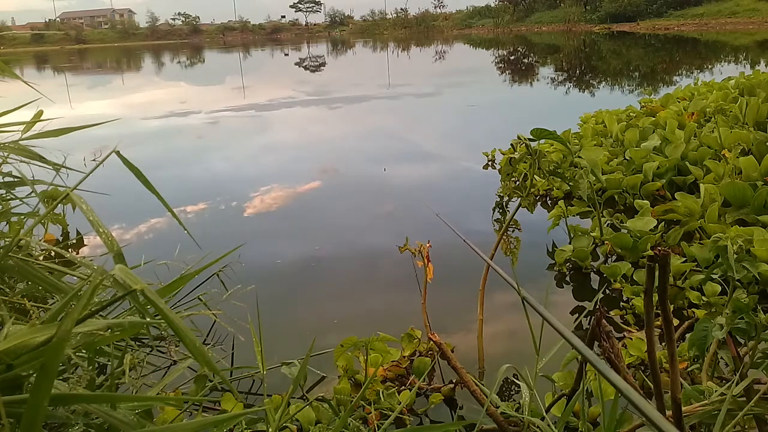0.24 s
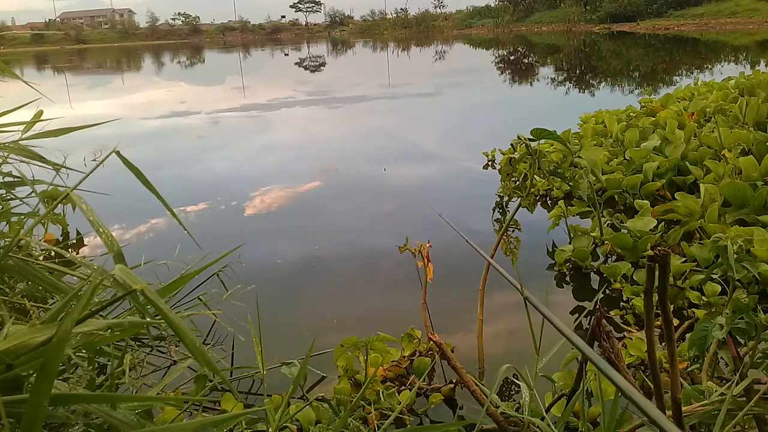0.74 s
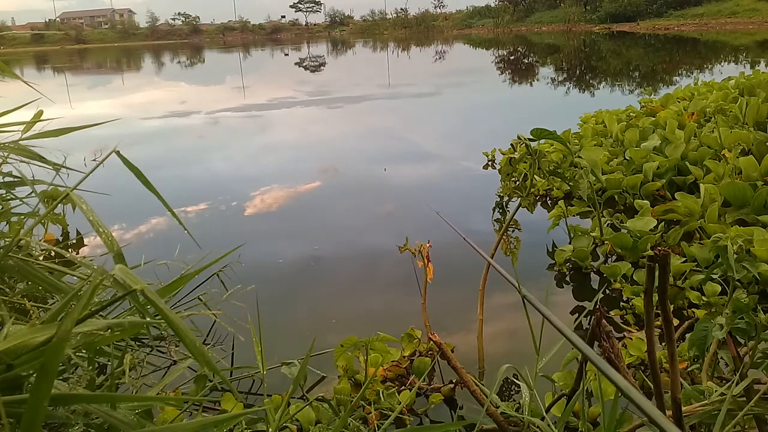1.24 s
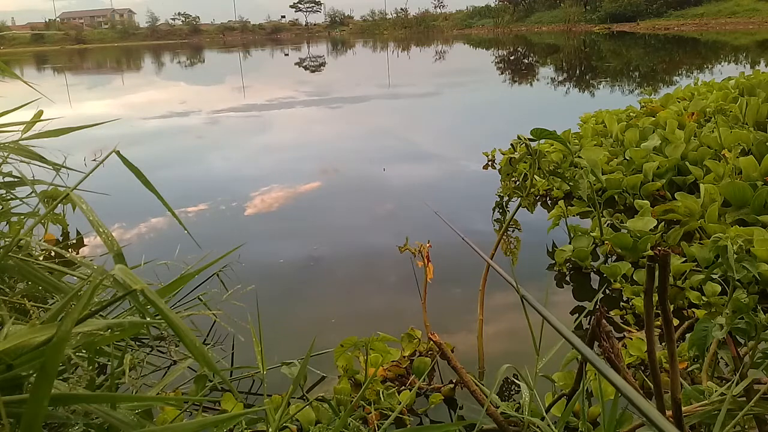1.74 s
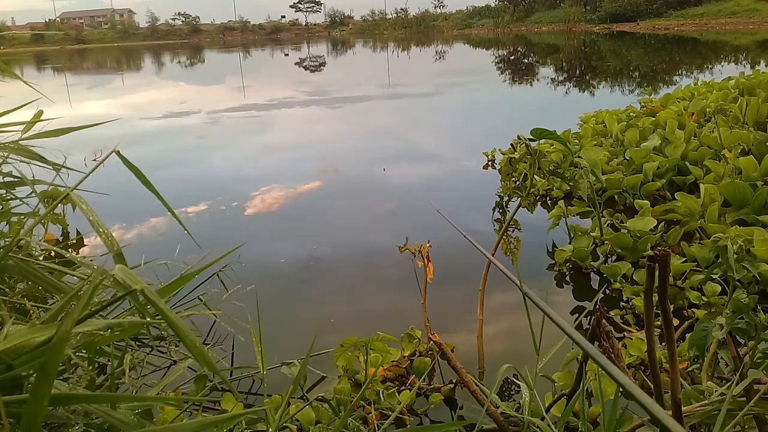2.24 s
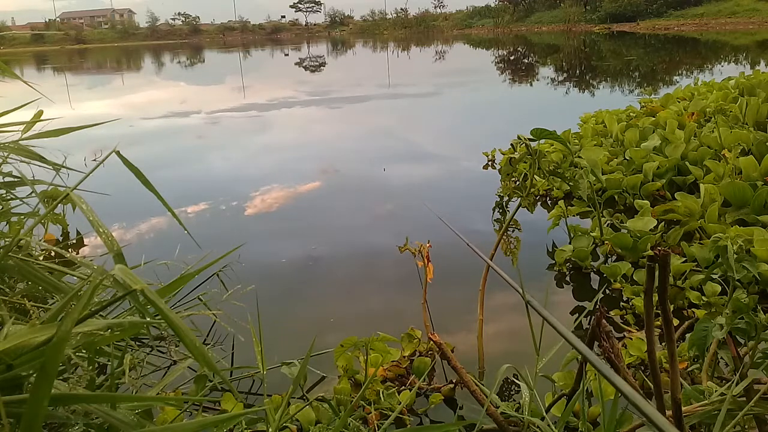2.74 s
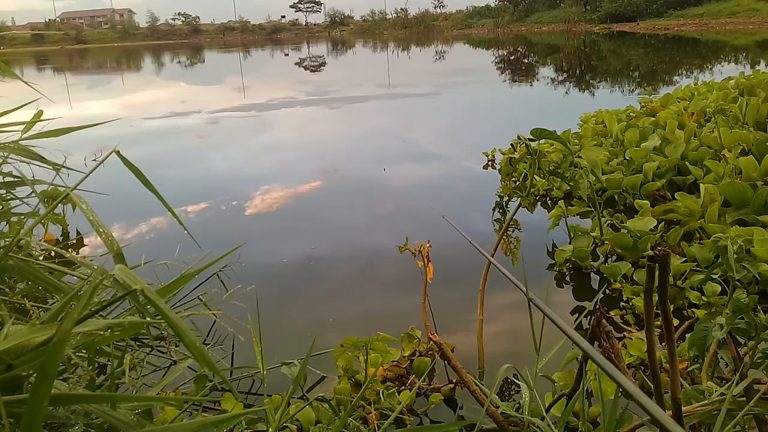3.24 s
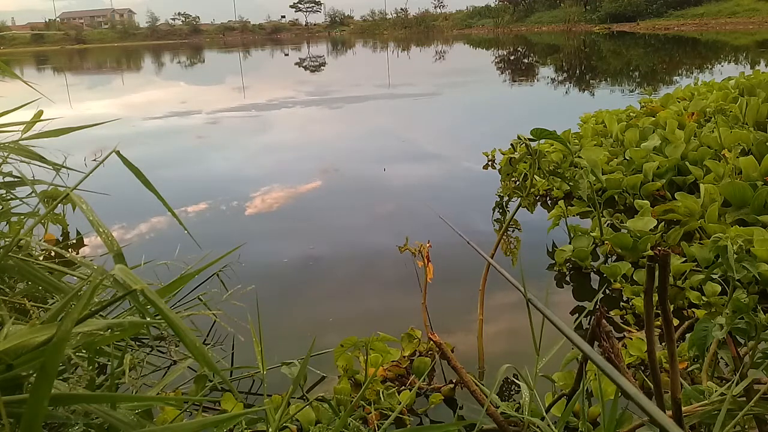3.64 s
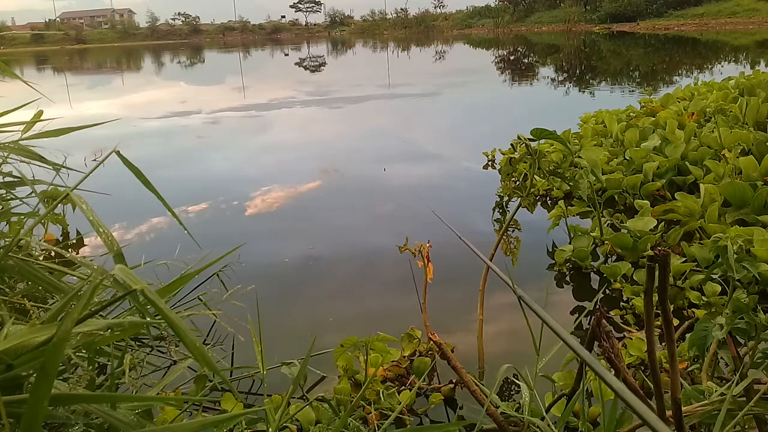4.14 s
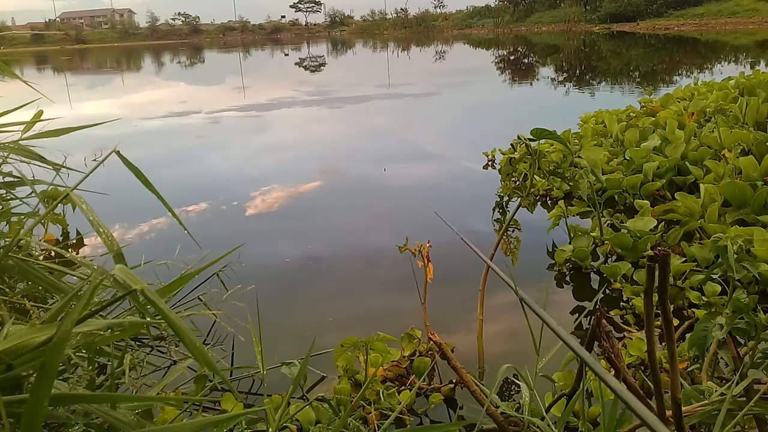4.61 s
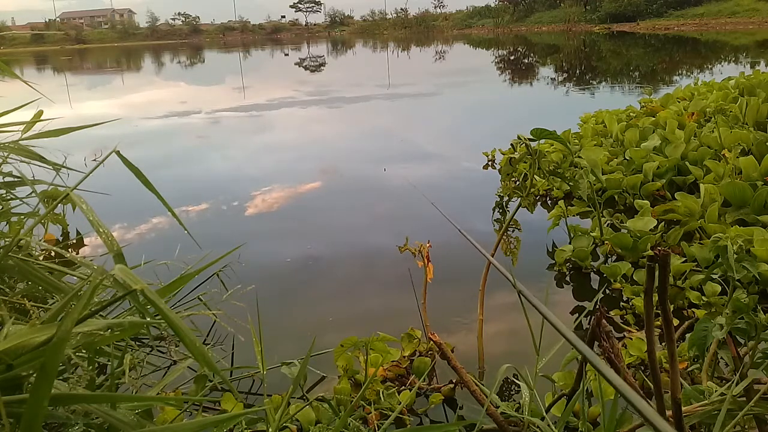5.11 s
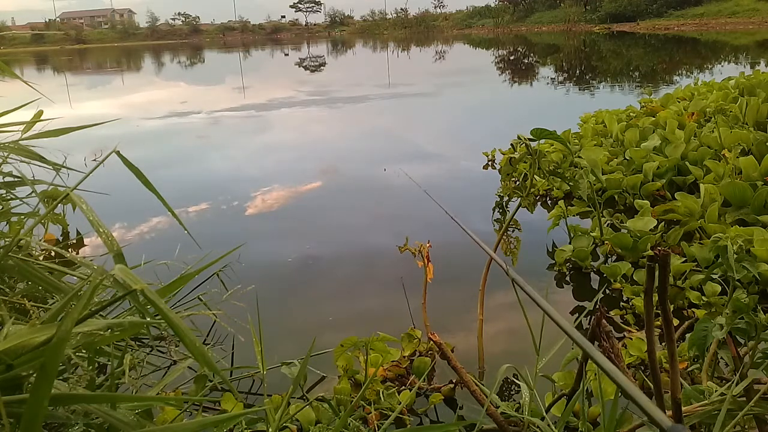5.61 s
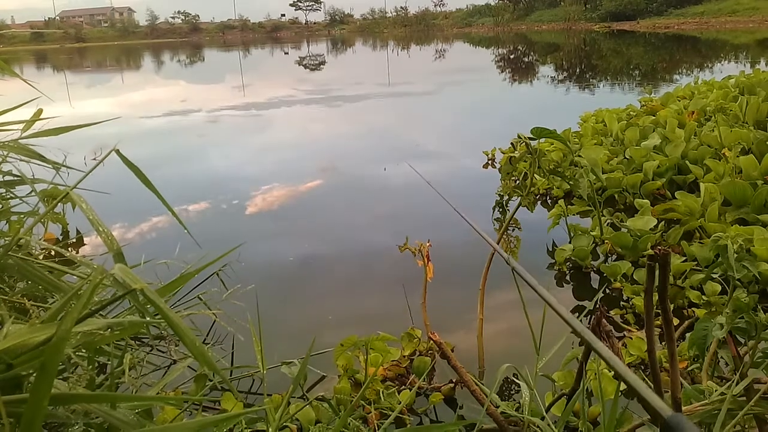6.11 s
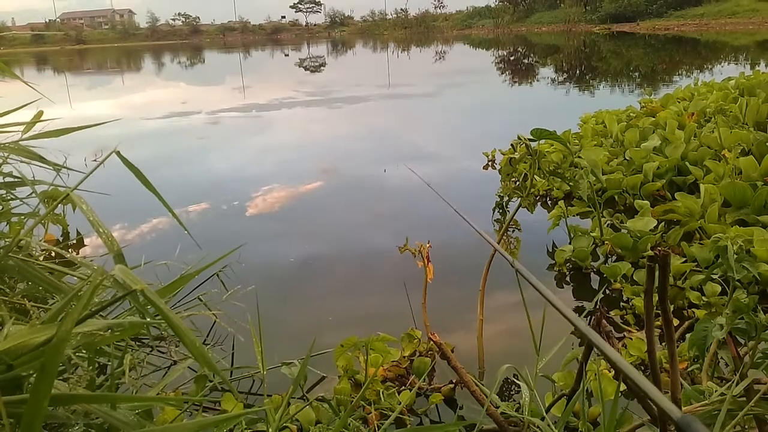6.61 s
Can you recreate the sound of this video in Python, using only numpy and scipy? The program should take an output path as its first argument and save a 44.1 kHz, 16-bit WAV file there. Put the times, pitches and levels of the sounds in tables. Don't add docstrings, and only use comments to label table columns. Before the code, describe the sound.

Evening beside a pond, heard by one microphone with faint hiss on both channels. A steady, deep distant rumble continues throughout; a soft low-mid engine drone fades as it moves away, mostly during the first second. From 0 to 1.9 s a near cricket gives crisp, very high chirps of a few rapid pulses, about seven a second, with small gaps. Distant crickets rasp more faintly, the louder one until 3 s, a weaker one throughout. A thin katydid buzz swells for about half a second and stops, roughly once a second. Sparse, faint bird notes grow denser from 3 s: falling slurs, arched peeps and drooping whistles, clearest around 3.7-5.1 s. A far flock flares softly near 3.8 and 6.3 s. Dry fishing-rod ticks dot the scene; at 5.9 s a quick rattle rings a small metal part, followed by ticks at 6.3 and 6.6 s.

```python
import sys
import numpy as np
from scipy import signal
from scipy.fft import rfft, irfft
from scipy.io import wavfile
from scipy.ndimage import map_coordinates

SR = 44100
rng = np.random.default_rng(int(sys.argv[2]) if len(sys.argv) > 2 else 0)


def inscribe(sig):
    pcm = np.round(np.clip(np.atleast_2d(sig).T, -1, 1) * 32767)
    wavfile.write(sys.argv[1], SR, pcm.astype(np.int16))


def volts_from_db(level):
    exponent = np.asarray(level, float) / 20
    return 10 ** exponent


N = 302526


def level(x, db):
    return x * volts_from_db(db) / np.sqrt(np.mean(x ** 2))


def ring(x, hz, width_hz):
    b, a = signal.iirpeak(hz, hz / width_hz, fs=SR)
    once = signal.lfilter(b, a, x)
    return signal.lfilter(b, a, once)


def walk(rate):
    spots = rng.standard_normal(size=6000)
    return map_coordinates(spots, [np.arange(N) * rate / SR], order=2)


def add(out, s, sound):
    i = int(s * SR)
    out[i:i + len(sound)] += sound[:N - i]


def scatter(x, t60_s, wet_db, gap_s=0.0097, smear_hz=260):
    t = np.arange(SR // 2) / SR
    decay = np.exp(-np.log(1000) * t / t60_s)
    onset = np.clip(t / gap_s, 0, 1) ** 2
    tail = rng.standard_normal(len(t)) * decay * onset
    tail *= volts_from_db(wet_db) / np.sqrt(np.sum(tail ** 2))
    smeared = x * walk(smear_hz)
    return x + signal.fftconvolve(smeared, tail)[:N]


def throb(rate_hz, sharp, jitter):
    wandering_hz = rate_hz * (1 + jitter * walk(24))
    phase = 2 * np.pi * np.cumsum(wandering_hz) / SR
    return np.exp(sharp * (np.cos(phase) - 1))


def phrases(rows, swell_db_per_s, fade_db_per_s, rest_db):
    t = np.arange(N) / SR
    out = np.full(N, float(rest_db))
    for s, hold, db in rows:
        swell = swell_db_per_s * np.clip(s - hold - t, 0, None)
        fade = fade_db_per_s * np.clip(t - s, 0, None)
        out = np.maximum(out, db - swell - fade)
    return out


def sing(rows):
    scoop_share, scoop_s = 1.59, 0.0071
    out, waver, flutter = np.zeros(N), walk(90), walk(85)
    for s, length, start_hz, change_hz, arch_hz, db in rows:
        u = np.linspace(0, 1, int(length * SR))
        arch = 4 * u * (1 - u) - scoop_share * np.exp(-u * length / scoop_s)
        hz = start_hz + change_hz * u + arch_hz * arch
        at = slice(int(s * SR), int(s * SR) + len(u))
        tone = np.sin(2 * np.pi * np.cumsum(hz * (1 + 0.008 * waver[at])) / SR)
        loudness = volts_from_db(db + 4.5 + 2.4 * (flutter[at] - flutter[at].mean()))
        out[at] += loudness * np.sin(np.pi * u) ** 0.36 * tone
    return scatter(out, 0.25, -3.5, 0.01, smear_hz=699)


def rumble():
    # frequency in Hz, density in dB per Hz.
    spectrum = [(14, -52.5), (25, -19.5), (50, -8), (85, 0), (150, 0), (200, -6.5), (300, -16),
                (420, -25.5), (590, -36.5), (1260, -44.5), (2400, -48), (3500, -52.5), (5200, -53.5),
                (6500, -64), (9000, -58.5), (16000, -62.5)]
    hz = np.maximum(np.fft.rfftfreq(N, 1 / SR), 1)
    spots, dbs = np.transpose(spectrum)
    colour = volts_from_db(np.interp(np.log(hz), np.log(spots), dbs))
    air = irfft(rfft(rng.standard_normal(N)) * colour, N)
    return level(air * volts_from_db(0.4 * walk(2.79)), -43.5)


def engine_drone():
    # time in s, level in dB.
    course = [
        (0.0, -63.5),
        (0.8, -69),
        (3.8, -70.5),
        (5.3, -74.5),
        (6.86, -73),
    ]
    course_db = np.interp(np.arange(N) / SR, *np.transpose(course))
    band = level(ring(rng.standard_normal(N), 484, 110), -3.0)
    return band * volts_from_db(course_db + 1.5 * walk(4.5))


def far_crickets():
    # end of hold in s, hold in s, level in dB.
    loud_singer = [
        (.02, .03, -74.5),
        (.31, 0.035, -74.5),
        (.63, .04, -73),
        (.95, 0.077, -74.5),
        (1.26, 0.065, -74),
        (1.7, .04, -82),
        (2.03, 0.064, -80),
        (2.34, .04, -78.5),
        (2.65, 0.016, -76.5),
        (2.97, .02, -74.5),
    ]
    # end of hold in s, level in dB.
    faint_singer = [(.09, -84), (.52, -87), (.8, -85), (1.05, -82), (1.4, -83), (1.88, -82), (2.2, -82),
                    (2.5, -81), (2.76, -86), (3.29, -83.5), (3.45, -88), (3.56, -81.5), (3.66, -86),
                    (3.78, -85), (3.9, -90), (4.0, -87), (4.12, -86), (4.24, -84), (4.47, -84), (4.72, -82),
                    (4.99, -82.5), (5.26, -83), (5.52, -89), (5.73, -88), (5.97, -83), (6.1, -85),
                    (6.21, -84), (6.44, -79.5), (6.72, -83)]
    faint = [(s, 0.033, db) for s, db in faint_singer]
    rest_db = -99
    loud_db = phrases(loud_singer, 202, 280, rest_db)
    faint_db = phrases(faint, 105, 253, rest_db)
    db = np.maximum(loud_db, faint_db)
    rasp = rng.standard_normal(N) * throb(118, 0.69, 0.0596)
    upper = volts_from_db(-4.5 - 0.83 * np.clip(-81.0 - db, 0, None)) * ring(rasp, 8590, 200)
    wings = (ring(rasp, 8150, 260) + upper) / np.std(ring(rasp, 8170, 277))
    return scatter(wings * volts_from_db(db - 0.8), 0.12, -0.5, 0.004)


def wing_flicks():
    # start in s, level in dB.
    flicks = [
        (0.013, -75),
        (0.44, -78),
        (1.24, -80),
        (1.665, -77),
    ]
    length_s, hz, sag_hz = .013, 7500, -100
    return sing([(s, length_s, hz, sag_hz, 0, db) for s, db in flicks])


def near_cricket():
    # first stroke in s, span in s, number of strokes, first stroke in dB, full stroke in dB.
    chirps = [(0.0731, 0.033, 5, -53.5, -49.5), (0.206, 0.044, 6, -56, -50.5),
              (0.341, 0.0341, 5, -54.5, -50.5), (0.4755, 0.042, 6, -53, -51), (0.617, 0.036, 5, -53, -49.5),
              (0.76, 0.026, 4, -58, -52), (0.894, 0.03, 4, -55.5, -52.5), (1.055, 0.018, 3, -56, -50),
              (1.3067, 0.0174, 3, -52, -52), (1.4262, 0.024, 4, -54, -50.5), (1.559, 0.035, 5, -57, -50),
              (1.71, 0.019, 3, -51.5, -49), (1.863, 0.0, 1, -51.5, -53)]
    out = np.zeros(N)
    chance = rng.standard_normal((len(chirps), 8, 4))
    rise_s = 0.0022
    t = np.arange(int(.012 * SR)) / SR
    hump = (t / rise_s * np.exp(1 - t / rise_s)) ** 1.65
    for (s, span, strokes, first_db, full_db), luck in zip(chirps, chance):
        count = int(round(strokes))
        for k in range(count):
            db = full_db + (first_db + 0.5 - full_db) * np.exp(-k) + 0.54 * luck[k, 0]
            hz = 7660 * (1 + .003 * luck[k, 1])
            tone = np.sin(2 * np.pi * (hz * t - 9000 * t ** 2) + 3 * luck[k, 2])
            tone += volts_from_db(-15) * np.sin(2 * np.pi * 0.965 * hz * t + 5 * luck[k, 2])
            tone += volts_from_db(-24) * np.sin(2 * np.pi * 0.93 * hz * t + 7 * luck[k, 2])
            start = s + span * k / max(count - 1, 1) - rise_s + 0.00036 * luck[k, 3]
            add(out, start, volts_from_db(db - 0.5) * hump * tone)
        add(out, s - .0075, volts_from_db(first_db - 12) * hump * tone)
    out += volts_from_db(-8.5) * np.roll(out, int(.0033 * SR))
    return scatter(out, 0.14, -13, .004)


def bird_calls():
    # start in s, length in s, level in dB.
    slurs = [(3.202, .051, -82), (3.397, 0.062, -81), (3.533, .05, -84), (3.625, .025, -83),
             (3.737, .04, -79), (3.903, .06, -80), (4.073, 0.055, -79), (4.31, 0.041, -78.5),
             (4.488, 0.06, -76.5), (4.665, .06, -79), (5.023, .048, -76), (5.2, 0.047, -78),
             (5.387, 0.043, -76.5), (5.61, .057, -77), (6.14, .03, -86), (6.625, .03, -83),
             (6.72, .05, -79)]
    # start in s, length in s, level in dB.
    whistles = [
        (3.75, .096, -75),
        (4.186, 0.1, -72),
        (4.803, .11, -69.5),
        (5.081, 0.056, -73),
    ]
    # start in s, length in s, pitch in Hz, arch in Hz, level in dB.
    peeps = [(2.09, .04, 3800, 20, -88), (2.73, .055, 3830, 60, -86), (3.175, 0.033, 4060, -40, -85),
             (3.333, 0.085, 3840, 122, -82.5), (3.709, 0.088, 4000, 140, -81), (3.811, 0.05, 4200, 77, -72),
             (3.962, .025, 4360, -50, -77), (4.02, 0.064, 3830, -17, -80), (4.17, .06, 3980, 60, -85),
             (4.933, 0.092, 4200, 130, -72.5), (5.11, .067, 3900, 0, -73), (5.519, .049, 4520, 90, -79),
             (6.042, .07, 3940, 50, -80.5), (6.173, 0.075, 3850, 280, -76), (6.313, .065, 4270, 122, -74.5)]
    # start in s, length in s, start in Hz, end in Hz, level in dB.
    glides = [(.27, .04, 5450, 5250, -85), (.32, .08, 5150, 5000, -86), (0.517, 0.049, 3260, 3340, -78),
              (.605, .02, 1650, 1650, -80), (.74, 0.025, 3230, 3330, -86), (.92, .03, 5000, 4900, -85),
              (.995, .03, 2930, 2920, -86), (1.04, .05, 4700, 4540, -90), (1.628, .035, 3310, 3330, -83),
              (1.97, .04, 5270, 5270, -87), (2.15, .02, 5470, 5500, -83), (2.65, .09, 5080, 5030, -90),
              (3.213, 0.069, 4380, 4270, -85), (3.918, 0.045, 4320, 4610, -76.5),
              (4.091, 0.031, 1350, 1390, -78), (4.726, 0.063, 4460, 4270, -83),
              (5.488, .02, 4560, 4840, -83), (5.545, .049, 4520, 4220, -81),
              (5.596, 0.089, 4400, 4280, -76), (6.11, .015, 4330, 4980, -83), (6.19, .06, 5050, 4750, -78),
              (6.602, 0.057, 3680, 4120, -74.5)]
    # break in s, rise in s, top in Hz, level in dB.
    chups = [
        (1.164, .033, 3220, -76.5),
        (4.261, 0.015, 3150, -74.5),
    ]
    rows = [(s, d, 5250, -12000 * d, 0, db) for s, d, db in slurs]
    rows += [(s, d, 4750, -4900 * d, 257.5 * (10 * d) ** 2, db) for s, d, db in whistles]
    rows += [(s, d, hz, -600 * d, arch_hz, db) for s, d, hz, arch_hz, db in peeps]
    rows += [(s, d, hz, end_hz - hz, 0, db) for s, d, hz, end_hz, db in glides]
    break_hz, fall_s, fall_hz = 300, 0.04, 260
    for s, d, hz, db in chups:
        climb_hz = 22000 * d
        rows.append((s - d, d, hz - break_hz - climb_hz, climb_hz, 0, db - 5))
        rows.append((s, fall_s, hz, -fall_hz, -40, db))
    return sing(rows)


def katydid():
    # start in s, stop in s, final level in dB.
    crescendos = [
        (0.3, 0.95, -88),
        (1.42, 1.94, -81.5),
        (2.38, 2.99, -82),
        (3.42, 4.0, -81),
        (4.42, 4.987, -79),
        (5.35, 5.97, -79.5),
        (6.25, 6.95, -82.5),
    ]
    t = np.arange(N) / SR
    effort = np.zeros(N)
    for s, stop, db in crescendos:
        corners = [s, (s + stop) / 2, stop, stop + 0.022]
        effort += volts_from_db(db) * np.interp(t, corners, [0.014, 0.55, 0.73, 0.034])
    rasp = rng.standard_normal(N) * throb(96.2, 0.45, .002) * effort
    rasp /= np.std(ring(rasp / np.maximum(effort, 1e-9), 9950, 300))
    wings = volts_from_db(-1.0) * ring(rasp, 9960, 160) + volts_from_db(-7.0) * ring(rasp, 9450, 900)
    return scatter(wings, 0.24, -5.5)


def rod():
    # time in s, peak level in dB, centre frequency in Hz.
    ticks = [(0.519, -68, 5300), (0.583, -65.5, 5330), (0.64, -68, 6000), (1.053, -68, 5600),
             (1.455, -72, 5300), (1.56, -69, 5500), (1.865, -70, 6000), (2.955, -70, 6500),
             (5.245, -64, 5100), (5.934, -59, 5500), (5.939, -62, 5500), (5.944, -60, 5600),
             (5.95, -66, 5400), (6.28, -61, 4900), (6.352, -64, 5200), (6.64, -63, 4900)]
    # frequency in Hz, level in dB, 60 dB decay time in s.
    modes = [
        (3600, 2.5, 0.11),
        (4330, -9, 0.15),
        (4931, -10, 0.2),
        (5250, 5, 0.12),
        (5850, 0, 0.06),
    ]
    out = np.zeros(N)
    t = np.arange(SR // 5) / SR
    grit = rng.standard_normal((len(ticks), len(t))) * np.exp(-t / 0.0016)
    for (s, db, hz), g in zip(ticks, grit):
        click = ring(g, hz, 1250)
        add(out, s, volts_from_db(db) * click / np.abs(click).max())
    clink = np.zeros(len(t))
    for hz, db, t60 in modes:
        decay = np.exp(-np.log(1000) * t / (0.77 * t60))
        clink += volts_from_db(db) * np.sin(2 * np.pi * hz * t) * decay
    add(out, 5.938, volts_from_db(-66.5) * clink * np.clip(t / 0.0021, 0, 1))
    return scatter(out, 0.18, -1.3, 0.0044)


def far_flock():
    # peak in s, level in dB.
    flares = [
        (.88, -82),
        (1.3, -85),
        (2.0, -85),
        (3.8, -77.5),
        (4.1, -80),
        (4.35, -85),
        (5.04, -80),
        (6.0, -83),
        (6.27, -76),
        (6.86, -82),
    ]
    # end of hold in s, hold in s, level in dB.
    bursts = [
        (3.81, .07, -81),
        (5.2, .005, -84),
        (6.22, .02, -87),
        (6.38, .04, -83.5),
    ]
    flares_db = phrases([(s, 0, db) for s, db in flares], 29, 38, -89.5)
    bursts_db = phrases(bursts, 260, 210, -100)
    flock = level(ring(rng.standard_normal(N), 5120, 800), -4.5) * volts_from_db(flares_db + 1.6 * walk(11))
    chatter = level(ring(rng.standard_normal(N), 4470, 2600), 0) * volts_from_db(bursts_db + 3.9 * walk(70))
    return flock + chatter


def scene():
    air = rumble() + engine_drone()
    insects = far_crickets() + wing_flicks() + near_cricket() + katydid()
    mono = air + insects + bird_calls() + rod() + far_flock()
    return np.array([mono, mono])


def top_cut(x):
    return signal.sosfilt(signal.butter(12, 15730, fs=SR, output="sos"), x)


def record(dry):
    hiss = signal.lfilter([1, -.1], [1], rng.standard_normal(dry.shape))
    low_pass = signal.ellip(10, .1, 60, 15700, fs=SR, output="sos")
    mix = signal.sosfilt(low_pass, dry + level(hiss, -76))
    return top_cut(mix)


dry = scene()
out = record(dry)
inscribe(out)
```